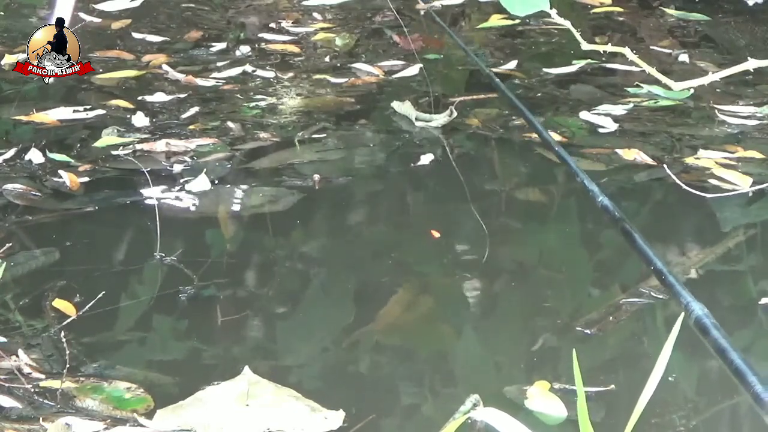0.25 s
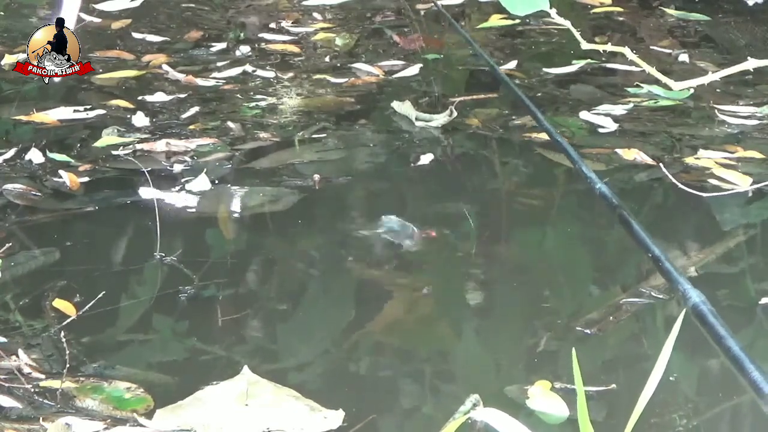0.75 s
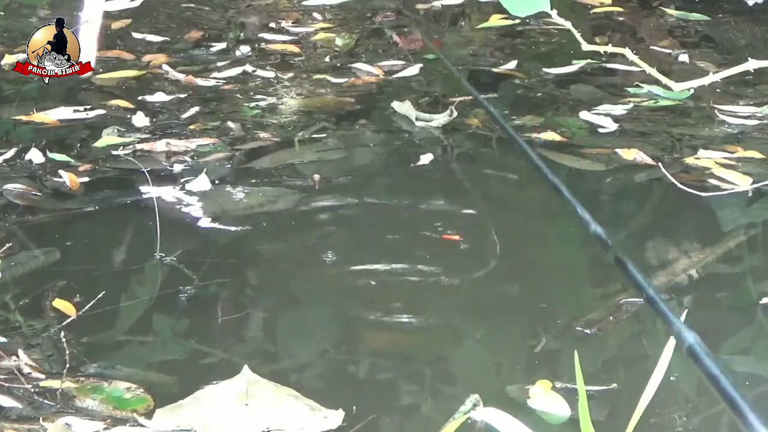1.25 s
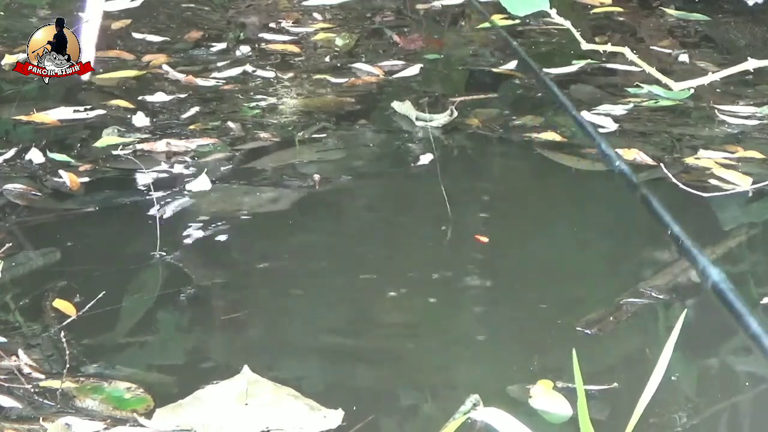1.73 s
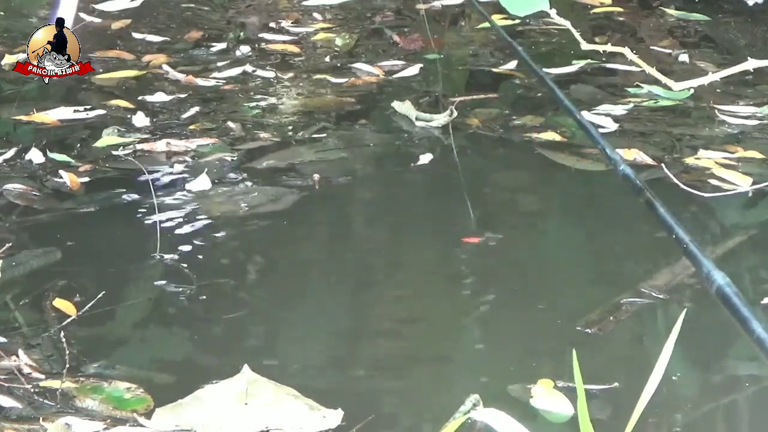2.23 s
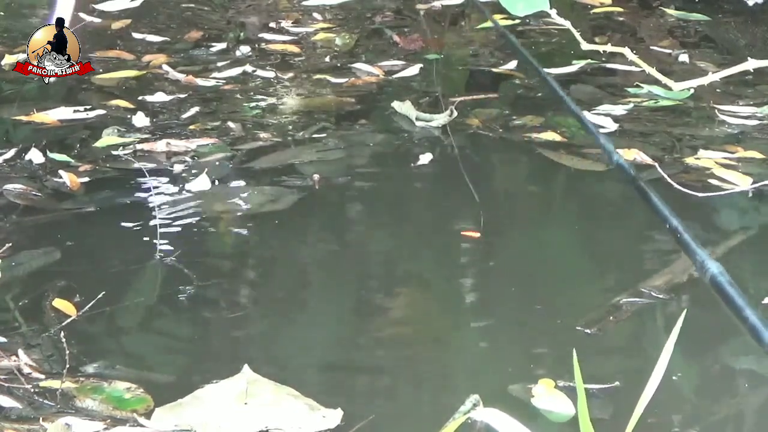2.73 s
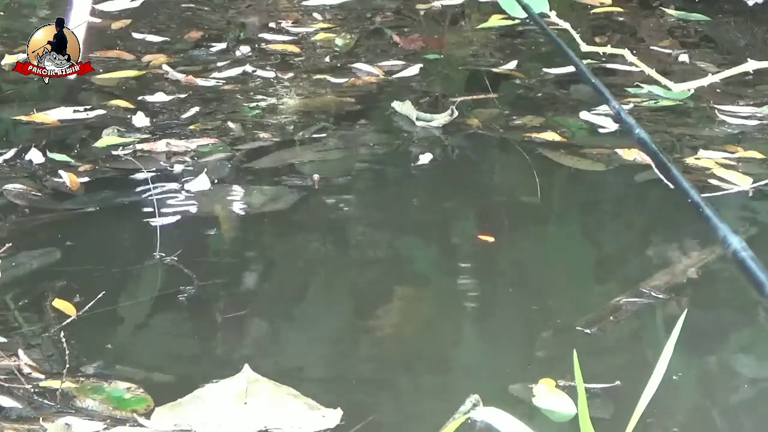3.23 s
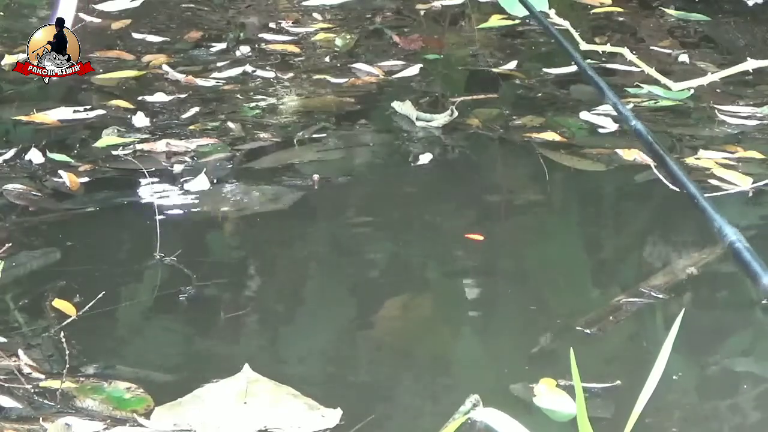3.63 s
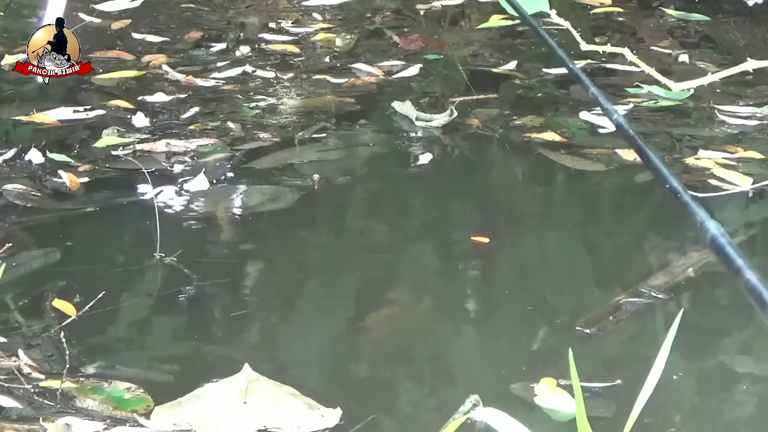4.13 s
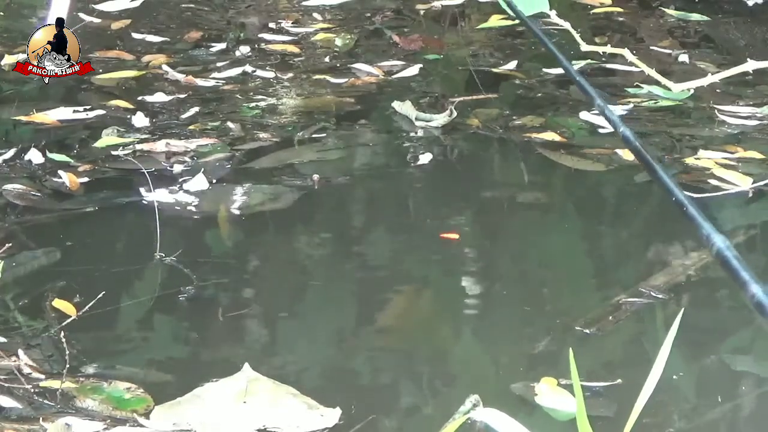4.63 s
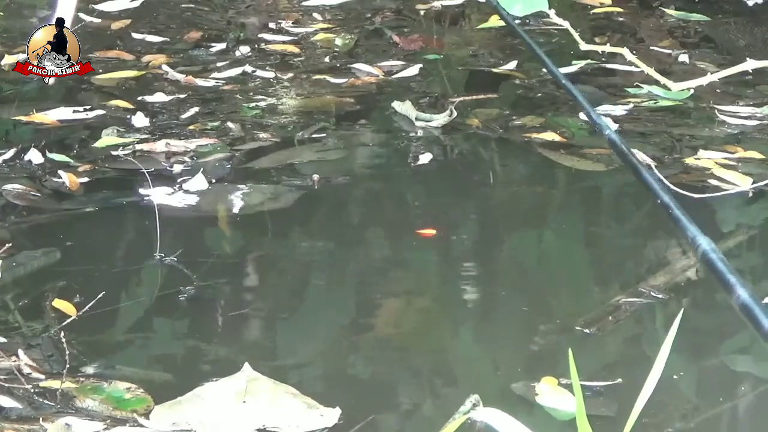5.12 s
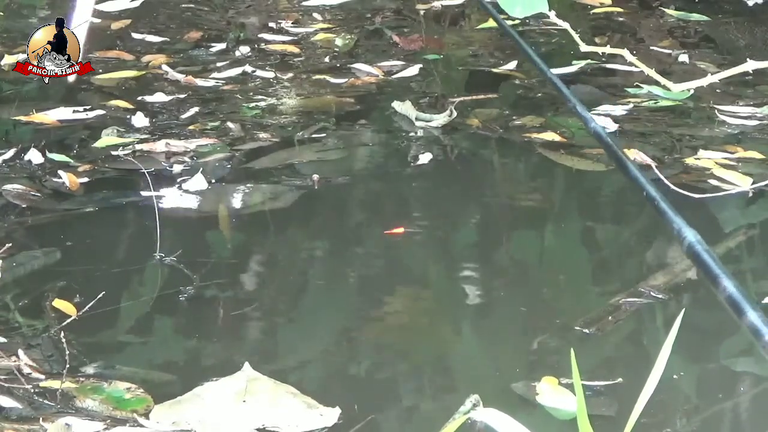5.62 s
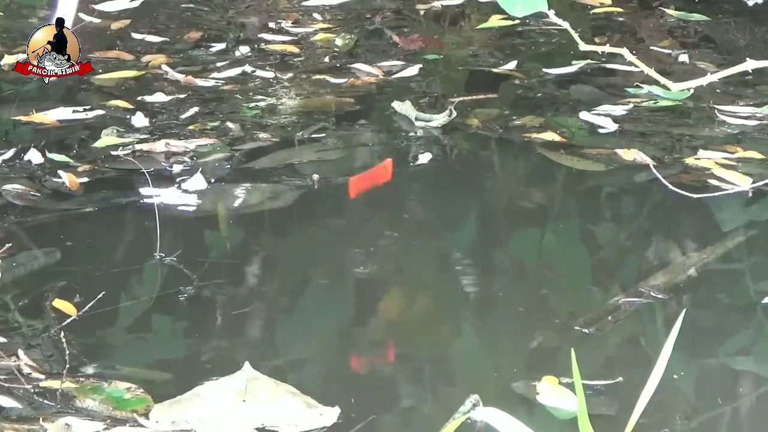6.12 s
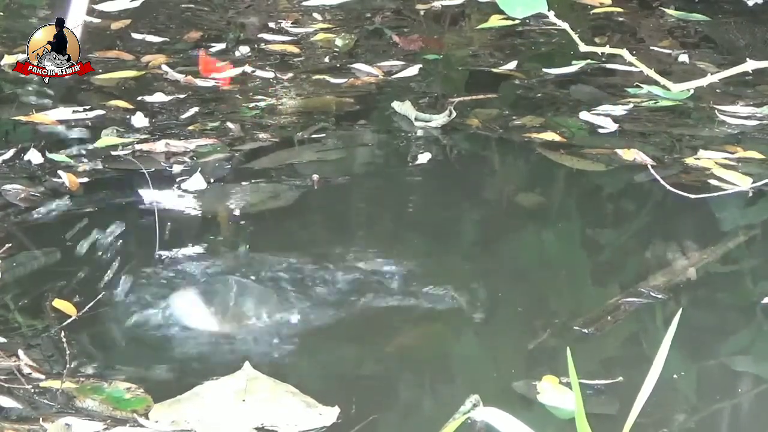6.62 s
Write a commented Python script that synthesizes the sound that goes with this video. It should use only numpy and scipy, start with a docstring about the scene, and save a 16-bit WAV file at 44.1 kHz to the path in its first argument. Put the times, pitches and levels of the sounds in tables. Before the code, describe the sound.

A quiet forest pond in four abruptly joined moments. From 0 to 3.2 seconds, a bush cricket rasps close by around 9 kHz, in buzzy chirps of about ten rapid pulses, roughly seven chirps a second with tiny hesitations, swelling louder. Low wind puffs thump the microphone until about 1.7 seconds; tiny bubble ticks come near 0.8. Dry line rustles tick from 2 seconds, and the pole knocks at 3.1. At 3.2 the cricket drops back, fainter and farther, until 4.9, while thin falling bird calls and warbles sound. From 4.9 to 5.9 the cricket is gone: a duller hush, with sliding, echoing bird whistles. Then light tackle taps and more birdsong, before a sharp fish slap at 6.4 bursts into spray, drops and bubbles, and a second, softer, plunging one follows at 6.7.

```python
"""A forest pond in four moments, cut one after another, while someone fishes with a pole.
A bush cricket rasps in runs of swept tone pulses, close by, then farther off; birds whistle as bent glides.
Filtered noise makes the hush, the far insects and the air that buffets the microphone.
Tackle rustles and clicks in noise bursts; at the end a hooked fish slaps the surface twice,
as noise bursts for slap and spray with ringing bubbles of rising pitch."""
import sys
import numpy as np
from scipy import signal
from scipy.fft import rfft, irfft
from scipy.io import wavfile
from scipy.ndimage import uniform_filter1d

SR = 44100
rng = np.random.default_rng(int(sys.argv[2]) if len(sys.argv) > 2 else 0)


def file_out(sig):
    """Save sig as 16-bit WAV at sys.argv[1]."""
    # one column per channel
    cols = np.atleast_2d(sig).T
    # limit, then scale
    lim = np.clip(cols, -1, 1)
    pcm = np.round(lim * 32767).astype(np.int16)
    wavfile.write(sys.argv[1], SR, pcm)


N = 302809
TIME_S = np.arange(N) / SR
BINS_HZ = np.fft.rfftfreq(1024, 1 / SR)

# edges of the four moments: [t/s]
CUTS_S = [0, 3.236, 4.905, 5.915, 7]
# hush spectrum, one list per moment: [f/Hz, relative density/dB per Hz]
HUSH_SPECTRA = [
    [(15, -23), (25, -1), (64, -2.5), (169, -7), (342, -13), (549, -13.5), (617, -15.5), (1010, -16),
     (1550, -18.5), (7000, -26), (9100, -56), (15400, -120)],
    [(15, -33), (25, -5), (165, -1.5), (334, -11.5), (1250, -15.5), (1340, -17), (2660, -17.5), (2860, -20),
     (4800, -22), (7000, -26.5), (9100, -61), (15400, -120)],
    [(15, -31), (25, -1.5), (124, -1), (301, -10.5), (592, -13), (730, -13), (1220, -17), (1650, -15.5),
     (2560, -9), (3630, -21.5), (6500, -27.5), (8450, -53), (14300, -120)],
    [(15, -30), (25, -5.5), (127, 1.5), (394, -10), (476, -8), (1440, -13.5), (1620, -11), (2600, -13),
     (3140, -11.5), (7000, -29.5), (9100, -52), (15400, -120)],
]
# hush, one per moment: [level/dB]
HUSH_LEVELS_DB = [-53.5, -55, -60, -54]
# far insects and a low drone: [moment index, centre f/Hz, width/Hz, level/dB]
CHORUS_BANDS = [(0, 9260, 980, -61), (0, 7830, 650, -94), (0, 171, 21, -65.5), (1, 9570, 590, -63),
                (1, 7800, 800, -68.5), (1, 161, 12, -66), (2, 7500, 280, -74), (2, 7600, 850, -72),
                (3, 9400, 320, -65.5), (3, 8350, 1300, -64.5)]
# left-right likeness of the hush: [f/Hz, correlation 0..1]
HUSH_LIKENESS = [(50, 1), (110, 1), (200, 0.96), (400, 0.4), (1400, 0.17), (4000, 0.49), (10000, 0.41)]

# puffs of air on the microphone: [crest t/s, level/dB, half-length/s]
PUFFS = [(.07, -41, .025), (0.235, -40.5, 0.12), (0.323, -35, 0.029), (0.389, -37, 0.018),
         (0.502, -40, 0.025), (0.648, -33.5, 0.026), (0.733, -35.5, 0.045), (1.07, -46.5, 0.089),
         (1.35, -42.5, 0.059), (1.47, -42, 0.035), (1.647, -40, 0.016)]
# air on the microphone: [f/Hz, relative density/dB per Hz]
BUFFET_SPECTRUM = [(12, -35.5), (20, -5.5), (53, 1.5), (87, -1), (170, -15.5), (348, -27.5), (500, -37.5),
                   (650, -53), (1100, -120)]
DRAUGHT_START_DB, DRAUGHT_FADE_DB_PER_S = -48, 6  # under the puffs

# cricket song, interpolated in time:
# [t/s, f/Hz, longest stroke/s, downward sweep/Hz, left over right/dB, echo/dB re direct, strokes per chirp]
CRICKET_SONG = [(0, 9220, 0.0028, 750, -3.5, -6, 10.4), (1.099, 9220, 0.0025, 797, -2.5, -4.5, 11.5),
                (2.393, 9290, 0.003, 634, -5, -6, 10.3), (3.23, 9330, 0.0034, 550.3, -3, -8, 11.6),
                (3.287, 9150, .0047, 180, 2.5, -4, 11), (4.9, 9096, .0054, 150, 1.5, -4.5, 11.3)]
# even runs of chirps, a slight stumble between: [first chirp end t/s, last chirp end t/s, chirps]
CHIRP_RUNS = [(.053, .623, 6), (.726, 1.302, 6), (1.413, 2.318, 9), (2.436, 2.771, 4), (2.876, 3.223, 4),
              (3.301, 4.868, 15)]
# cricket warms up, then is farther off: [t/s, level/dB before lift_db in cricket()]
CRICKET_LEVELS = [(0, -43), (1.4, -37.5), (2.85, -32), (3.23, -33.5), (3.29, -47.5), (3.9, -47.5),
                  (4.87, -45)]
CHIRP_JITTER_S, CHIRP_UNEVEN_DB = .0005, 0.5

# faint, almost steady tones from far away: [t/s, length/s, f/Hz, level/dB]
DISTANT_TONES = [(0.079, 0.26, 1432, -67), (1.026, 0.18, 1400, -69), (1.122, 0.54, 1120, -77.5),
                 (3.738, 0.31, 1290, -67.5), (3.78, 0.3, 964, -67), (5.1, 0.43, 429.4, -72)]

# line and leaves brush the pole: [t/s, level/dB, centre f/Hz, decay/s]
BRUSHES = [(.335, -52.5, 5500, .02), (2.051, -46, 8180, 0.007), (2.259, -43, 7750, 0.0076),
           (2.285, -43, 7200, .0075), (2.803, -40, 8000, 0.0087), (3.087, -43, 6500, .0072),
           (3.195, -37, 6100, 0.0022), (3.199, -49, 6040, 0.052), (6.132, -50, 5030, 0.0046),
           (6.144, -51, 4000, 0.0054)]
# light taps of the tackle: [t/s, level/dB, centre f/Hz, decay/s]
TACKLE_TAPS = [(1.648, -42.5, 750, 0.0019), (3.099, -45.5, 1710, 0.011), (5.801, -38.5, 3080, 0.0028),
               (5.918, -46.5, 1370, 0.01), (5.966, -49, 1610, .0086), (6.088, -41.5, 1700, 0.0083),
               (6.267, -46.5, 1520, 0.0081)]
# bands of the knocked pole: [level/dB, centre f/Hz, width/octaves, decay/s]
POLE_BANDS = [(-39.5, 636, 0.18, 0.01), (-55, 1240, 0.063, .0086), (-39, 2930, 0.28, 0.0084),
              (-32, 5900, .97, 0.0038)]
RUSTLE_OCTAVES, TAP_OCTAVES, KNOCK_S = 0.65, 1, 3.108

# clearest bubbles at the surface: [t/s, level/dB, f/Hz, decay/s, pitch rise per decay time/share]
CLEAR_BUBBLES = [(.786, -41.5, 2800, 0.0022, 0.018), (.833, -45.5, 3100, .003, .02),
                 (6.452, -32.5, 1180, 0.0024, .03), (6.468, -28.5, 1390, 0.0026, 0.035),
                 (6.487, -40, 2140, 0.0071, 0.14), (6.624, -40.5, 1025, 0.017, 0.35),
                 (6.652, -43.5, 1295, 0.012, .12), (6.628, -42, 573, 0.031, 0.0039),
                 (6.717, -28, 913, 0.0041, .01), (6.733, -27, 550, .0046, .03),
                 (6.757, -34.5, 1386, .008, .26), (6.774, -22.5, 2900, 0.0012, 0.032),
                 (6.807, -28, 2670, 0.0033, .02), (6.853, -33, 884, 0.0096, .01)]
# slap, then the water closes: [t/s, level/dB, centre f/Hz, decay/s, wait to closing/s, closing level/dB]
FISH_SLAPS = [(6.4073, -15.5, 3600, .00067, .0495, -23.5), (6.7138, -28.5, 1340, 0.0057, .031, -35.5)]
# spray of each slap, as low push, broad wash, hiss, fine mist: [level/dB, centre f/Hz, width/octaves, decay/s]
SPRAY_BANDS = [(-42, 650, 0.29, .0062), (-44.5, 1800, 2.7, 0.14), (-44.5, 3560, 0.18, 0.079),
               (-44, 8700, 0.14, 0.041)]
# large drops land: [t/s, level/dB, decay/s]
LARGE_DROPS = [(6.4501, -26, 0.00075), (6.4986, -21, 0.00073), (6.513, -32, 0.0011), (6.542, -39, 0.0062),
               (6.665, -46, 0.0043), (6.707, -37, 0.0063), (6.746, -26, 0.0016), (6.772, -36, 0.0035),
               (6.806, -44.5, 0.015), (6.851, -40.5, 0.0084)]
SLAP_OCTAVES, DROP_HZ, DROP_OCTAVES = 0.87, 3100, 0.69
CLOSING_HZ, CLOSING_OCTAVES, CLOSING_DECAY_S = 3380, 0.69, .012

# warbled notes: [t/s, level/dB, f/Hz at the bend's midpoint, glide/octaves, echo level/dB]
WARBLE_NOTES = [(.922, -55.5, 2150, 0.57, -61), (4.335, -60, 3180, 0, -72), (4.412, -62, 2780, -.2, -60),
                (4.452, -45, 3445, -0.28, -47.5), (4.62, -60, 2994, .2, -51.5),
                (4.655, -51.5, 3680, .08, -45), (4.745, -53, 2700, -0.41, -51),
                (4.779, -51.5, 1960, -0.11, -60), (4.813, -43.5, 3226, -0.45, -47.5),
                (4.97, -63, 2634, -0.38, -56.5), (5.012, -59.5, 1520, -0.25, -62),
                (5.04, -56, 3074, 0.17, -52.5), (5.145, -55, 2100, -.25, -52.5),
                (5.23, -46.5, 2500, -0.5, -52), (5.397, -63, 3000, .1, -59), (5.429, -52, 2370, 0, -53),
                (5.47, -46.5, 2714, 0.165, -48.5), (5.591, -58, 2000, -.3, -55.5),
                (5.671, -50.5, 2467, -0.25, -51), (5.86, -60, 2350, .17, -53.5),
                (5.907, -45, 3447, 0.23, -42.5), (6.009, -52.5, 2440, -.3, -51),
                (6.075, -50, 2990, -0.47, -46.5), (6.317, -54, 3620, .4, -47.5)]
NOTE_S, NOTE_S_PER_OCTAVE = .028, 0.0367  # wide glides take longer
NOTE_BEND = 1.69  # exponent: slow start, then the pitch bends away
# second bird, one high falling call: [t/s, level/dB, echo level/dB]
FALLING_CALLS = [(1.84, -65, -57), (3.518, -58, -59), (3.973, -55.5, -59), (4.445, -58.5, -57),
                 (4.84, -55.5, -56)]
CALL_S, CALL_TOP_HZ, CALL_END_HZ = 0.076, 6420, 3600
CALL_FALL_S = 0.062  # time constant of the fall
# level whistles of other birds: [t/s, length/s, f/Hz, level/dB]
LEVEL_WHISTLES = [(4.915, .1, 7290, -51), (5.944, 0.092, 4200, -56.5)]
WHISTLE_ECHO_DB = -7.5  # re direct
# birds, one per moment: [left over right/dB]
BIRD_PANS_DB = [0, 5.5, 4.0, 1]
FOREST_T60_S = 0.47

EDGE_HZ, DULL_EDGE_HZ = 11100, 8800


def gain_of(db):
    """Decibels to amplitude."""
    return 10 ** (np.asarray(db) / 20)


def evened(x):
    """Scaled to rms 1."""
    return x / np.sqrt(np.mean(x ** 2) + 1e-20)


def read(points, hz):
    """Table of (f/Hz, value) interpolated on a log-frequency axis."""
    f, value = np.transpose(points)
    return np.interp(np.log(hz + 1), np.log(f + 1), value)


def add(mix, start_s, sound):
    """Mixes a sound in at start_s; drops it if that is before zero."""
    start = round(start_s * SR)
    if start >= 0:
        part = mix[..., start:start + sound.shape[-1]]
        part += sound[..., :part.shape[-1]]


def panned(x, db):
    """Mono to stereo, left louder than right by db."""
    return x * gain_of([[db / 2], [-db / 2]])


def moment(index):
    """1 during one moment, 0 outside, edges smoothed over 64 samples."""
    inside = (TIME_S >= CUTS_S[index]) & (TIME_S < CUTS_S[index + 1])
    return uniform_filter1d(1. * inside, size=64)


def noise(spectrum_db, same, patchy_db):
    """Stereo noise of rms 1: random STFT bins, shaped, with patches drifting in time and frequency."""
    draws = rng.standard_normal((5, N // 256 + 5, len(BINS_HZ))).transpose(0, 2, 1)
    a, b, c, d, patches = draws
    patches = uniform_filter1d(patches, size=12, axis=0)
    patches = evened(uniform_filter1d(patches, size=14, axis=1))
    same = np.clip(same * np.ones(len(BINS_HZ)), -1, 1)[:, None]
    left = a + 1j * b
    right = same * left + np.sqrt(1 - same ** 2) * (c + 1j * d)
    bins = np.array([left, right]) * gain_of(spectrum_db[:, None] + patchy_db * patches)
    sound = signal.istft(bins, nperseg=1024, noverlap=768)[1]
    return evened(sound[:, :N])


def echo(x, t60_s, delay_s, spread):
    """Scatter from leaves and trunks: a dying noise tail, partly different in each ear."""
    t = np.arange(SR) / SR
    shape = gain_of(-60 * t / t60_s) * (1 - np.exp(-(t / delay_s) ** 2))
    mid, side = rng.standard_normal((2, SR)) * shape
    tail = np.array([mid + spread * side, mid - spread * side])
    tail /= np.linalg.norm(tail[0])
    return signal.fftconvolve(x[None], tail, axes=1)[:, :N]


def bursts(rows, grain_db, rise_s):
    """Each burst is a dying shower of tiny random impacts in one resonant band."""
    out = np.zeros(N)
    for start_s, db, hz, octaves, decay_s in rows:
        t = np.arange(round(6 * decay_s * SR) + 256) / SR
        grain = np.minimum(rng.exponential(1, len(t)), 3)
        impacts = rng.standard_normal(len(t)) * gain_of(grain_db * grain)
        distance = np.log2((np.fft.rfftfreq(len(t), 1 / SR) + 1) / hz) / octaves
        shower = irfft(rfft(impacts) / (1 + distance ** 2 / 4) ** 2, len(t))
        shape = np.exp(-t / decay_s) * (1 - np.exp(-t / rise_s))
        shape_rms = np.sqrt(np.mean(shape ** 2))
        add(out, start_s, gain_of(db) * evened(shower * shape) * shape_rms)
    return out


def forest():
    """Distant hush and bands of far insects, as shaped noise that differs in each moment."""
    out = np.zeros((2, N))
    for k, (spectrum, level_db) in enumerate(zip(HUSH_SPECTRA, HUSH_LEVELS_DB)):
        hush = noise(read(spectrum, BINS_HZ), read(HUSH_LIKENESS, BINS_HZ), patchy_db=1.23)
        power = np.zeros(len(BINS_HZ)) + 1e-20
        for index, hz, width_hz, db in CHORUS_BANDS:
            if round(index) == k:
                bell = np.exp(-.5 * ((BINS_HZ - hz) / width_hz) ** 2)
                power += gain_of(db) ** 2 * bell / bell.sum()
        chorus = np.sqrt(power.sum()) * noise(10 * np.log10(power), same=.6, patchy_db=.5)
        out += moment(k) * (gain_of(level_db) * hush + chorus)
    return out


def wind():
    """Low-pressure lumps on the microphone: bell-shaped puffs over a draught that dies away."""
    power = gain_of(DRAUGHT_START_DB - DRAUGHT_FADE_DB_PER_S * TIME_S) ** 2
    for crest_s, db, half_s in PUFFS:
        power = power + gain_of(db) ** 2 * np.exp(-2 * ((TIME_S - crest_s) / half_s) ** 2)
    return np.sqrt(power) * noise(read(BUFFET_SPECTRUM, BINS_HZ), same=0.89, patchy_db=0.5)


def chirps():
    """Chirp beat: (t/s of the last wing stroke, level/dB) each, slightly jittered."""
    ends_s = np.concatenate([np.linspace(first, last, round(count)) for first, last, count in CHIRP_RUNS])
    late, size = rng.standard_normal((len(ends_s), 2)).T
    levels_db = np.interp(ends_s, *np.transpose(CRICKET_LEVELS)) + CHIRP_UNEVEN_DB * size
    return zip(ends_s + CHIRP_JITTER_S * late, levels_db)


def cricket(swell_db=6.5, lift_db=4.0, rebound_db=-8.0, uneven_db=1.5, scatter_hz=54, shortening=0.33):
    """Each chirp is a swelling run of wing strokes; each stroke is a falling tone with a small rebound."""
    period_s, jitter_s = .00778, .0001
    direct, scattered = np.zeros((2, N)), np.zeros(N)
    song_s, *song = np.transpose(CRICKET_SONG)
    for end_s, db in chirps():
        hz, full_s, sweep_hz, pan_db, echo_db, strokes = (np.interp(end_s, song_s, c) for c in song)
        count = round(strokes)
        for k, (size, detune, late, phase) in enumerate(rng.standard_normal((count, 4))):
            # k counts back from the last stroke: opening strokes are softer and shorter
            weakness = (k / count) ** 1.3
            length_s = full_s * (1 - shortening * weakness)
            u = np.arange(0, 1, 1 / (length_s * SR))
            # the pitch drops as the wings slow down
            pitch_hz = hz + scatter_hz * detune + sweep_hz * (.5 - u) - 250 * u ** 6
            stroke = np.sin(np.pi * u) * np.sin(2 * np.pi * (np.cumsum(pitch_hz) / SR + phase))
            stroke *= gain_of(db + lift_db - swell_db * weakness + uneven_db * size)
            start_s = end_s - k * period_s - length_s / 2 + jitter_s * late
            add(direct, start_s, panned(stroke, pan_db))
            add(scattered, start_s, gain_of(echo_db) * stroke)
            half = len(u) // 2
            rebound = gain_of(rebound_db) * stroke[half:] * np.hanning(len(u) - half)
            add(direct, start_s + 1.2 * length_s, panned(rebound, pan_db))
    sound = direct + echo(scattered, t60_s=0.16, delay_s=0.0014, spread=0.4)
    return sound * (moment(0) + moment(1))


def far_tones():
    """Soft, slightly sagging sine tones, blurred by distance with a long echo."""
    out = np.zeros(N)
    for start_s, length_s, hz, db in DISTANT_TONES:
        t = np.arange(0, length_s, 1 / SR)
        tone = np.sin(2 * np.pi * hz * t * (1 - 0.014 * t))
        add(out, start_s, gain_of(db) * np.sin(np.pi * t / length_s) * tone)
    return out + gain_of(-3) * echo(out, t60_s=0.92, delay_s=0.0072, spread=.8)


def tackle():
    """Pole, line and leaves handled near the microphone: noise bursts for rustles, taps and one knock."""
    rows = [(s, db, hz, RUSTLE_OCTAVES, decay_s) for s, db, hz, decay_s in BRUSHES]
    rows += [(s, db, hz, TAP_OCTAVES, decay_s) for s, db, hz, decay_s in TACKLE_TAPS]
    rows += [(KNOCK_S, *band) for band in POLE_BANDS]
    clicks = bursts(rows, grain_db=2.5, rise_s=0.00024)
    return clicks + gain_of(-8.5) * echo(clicks, t60_s=0.19, delay_s=0.003, spread=1.1)


def bubble(db, hz, decay_s, rise):
    """A pocket of air rings, dies and climbs in pitch as it nears the surface."""
    t = np.arange(0, 6 * decay_s, 1 / SR)
    shape = np.exp(-t / decay_s) * (1 - np.exp(-t / 0.00026))
    return gain_of(db) * shape * np.sin(2 * np.pi * hz * t * (1 + rise * t / decay_s / 2))


def fish(count=70, small_db=-50, spread_db=4.5, cycles=5, flight_s=0.21):
    """Each slap throws spray and leaves a hollow that closes; drops patter back and bubbles ring."""
    impacts = [(s, db, DROP_HZ, DROP_OCTAVES, decay_s) for s, db, decay_s in LARGE_DROPS]
    closings = []
    for s, db, hz, decay_s, wait_s, closing_db in FISH_SLAPS:
        impacts.append((s, db, hz, SLAP_OCTAVES, decay_s))
        impacts += [(s, *band) for band in SPRAY_BANDS]
        closings.append((s + wait_s, closing_db, CLOSING_HZ, CLOSING_OCTAVES, CLOSING_DECAY_S))
    water = bursts(impacts, grain_db=8.5, rise_s=0.00023)
    water += bursts(closings, grain_db=15.0, rise_s=0.0044)
    for s, db, hz, decay_s, rise in CLEAR_BUBBLES:
        add(water, s, bubble(db, hz, decay_s, rise))
    # small random bubbles after each slap, few of them loud
    for source, flight, size, pitch in rng.random((count, 4)):
        hz = 1500 * 4.5 ** pitch
        db = small_db - spread_db * np.log(size + 0.022)
        slap_s = FISH_SLAPS[int(source * len(FISH_SLAPS))][0]
        add(water, slap_s + flight_s * flight, bubble(db, hz, cycles / hz, rise=0.034))
    return water + gain_of(-10.5) * echo(water, t60_s=0.25, delay_s=0.003, spread=0.6)


def whistle(pitch_hz, waver):
    """One sine note on a pitch curve, with a quick random flutter of rms share waver."""
    flutter = evened(uniform_filter1d(rng.standard_normal(len(pitch_hz)), size=50))
    phase = 2 * np.pi * np.cumsum(pitch_hz * (1 + waver * flutter)) / SR
    return np.sin(np.linspace(0, np.pi, len(pitch_hz))) * np.sin(phase)


def bird_notes():
    """Bent warble glides, falling calls, level whistles: (t/s, pitch curve/Hz, level/dB, echo/dB) each."""
    notes = []
    for s, db, hz, glide, echo_db in WARBLE_NOTES:
        length_s = NOTE_S + NOTE_S_PER_OCTAVE * abs(glide)
        u = np.linspace(0, 1, round(length_s * SR))
        notes.append((s, hz * 2 ** (glide * (u ** NOTE_BEND - .5 ** NOTE_BEND)), db, echo_db))
    # the call falls quickly at first, then levels out
    left = np.exp(-np.arange(0, CALL_S, 1 / SR) / CALL_FALL_S)
    fall_hz = CALL_END_HZ + (CALL_TOP_HZ - CALL_END_HZ) * (left - left[-1]) / (1 - left[-1])
    notes += [(s, fall_hz, db, echo_db) for s, db, echo_db in FALLING_CALLS]
    for s, length_s, hz, db in LEVEL_WHISTLES:
        notes.append((s, np.full(round(length_s * SR), hz), db, db + WHISTLE_ECHO_DB))
    return notes


def birds(waver_hz=75, blur_hz=150):
    """Whistled glides, much of them arriving as a blurred echo from the trees."""
    out, notes = np.zeros((2, N)), bird_notes()
    for k, pan_db in enumerate(BIRD_PANS_DB):
        direct, scattered = np.zeros((2, N))
        for s, pitch_hz, db, echo_db in notes:
            middle_s = s + len(pitch_hz) / SR / 2
            if CUTS_S[k] <= middle_s < CUTS_S[k + 1]:
                add(direct, s, gain_of(db) * whistle(pitch_hz, waver_hz / pitch_hz.mean()))
                add(scattered, s, gain_of(echo_db) * whistle(pitch_hz, blur_hz / pitch_hz.mean()))
        sound = direct + echo(scattered, FOREST_T60_S, delay_s=0.002, spread=0.3)
        out += moment(k) * panned(sound, pan_db)
    return out


def scene():
    """Everything at the pond."""
    return forest() + wind() + cricket() + far_tones() + tackle() + fish() + birds()


def low_passed(x, edge_hz):
    """Steep linear-phase low-pass."""
    taps = signal.firwin(401, edge_hz, window=("kaiser", 8), fs=SR)
    return signal.oaconvolve(x, taps[None], "same")


def record(dry):
    """Band limit; the third moment is duller."""
    dull, full = low_passed(dry, DULL_EDGE_HZ), low_passed(dry, EDGE_HZ)
    return full + moment(2) * (dull - full)


dry = scene()
out = record(dry)
file_out(out)
```